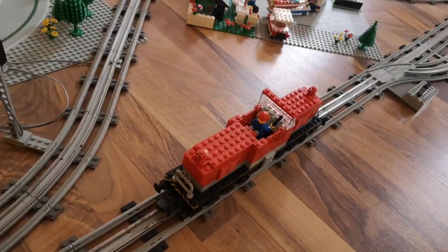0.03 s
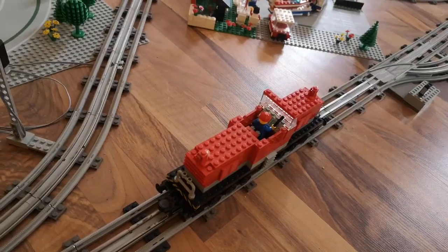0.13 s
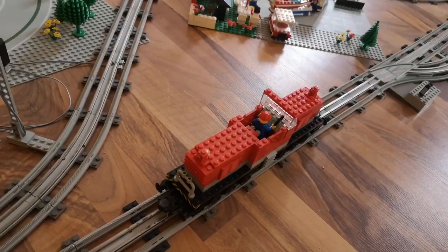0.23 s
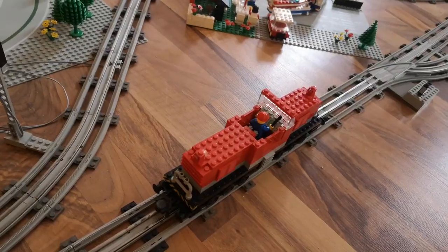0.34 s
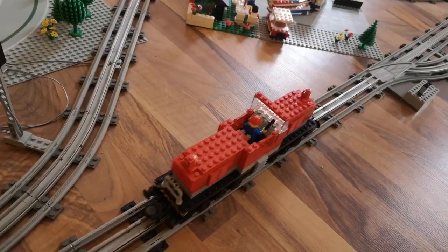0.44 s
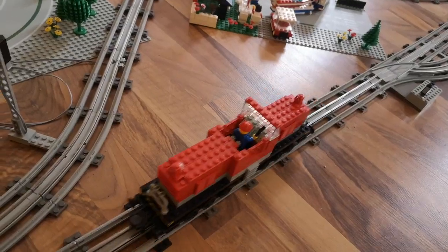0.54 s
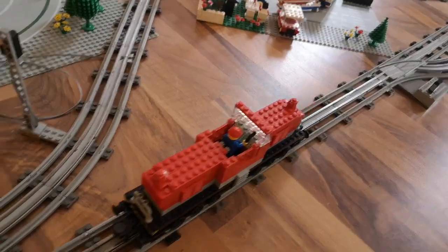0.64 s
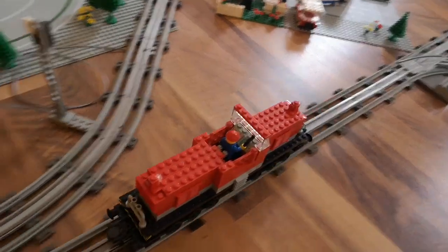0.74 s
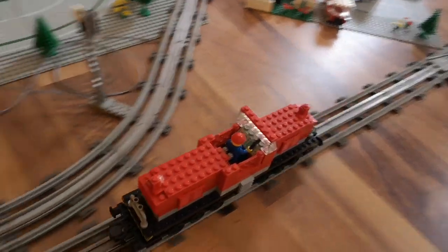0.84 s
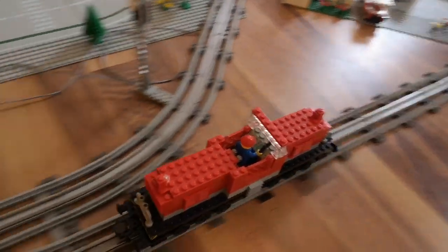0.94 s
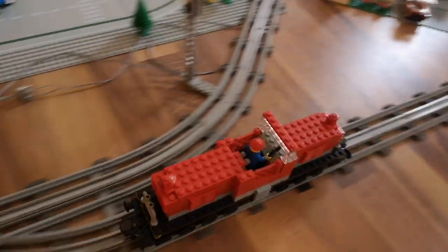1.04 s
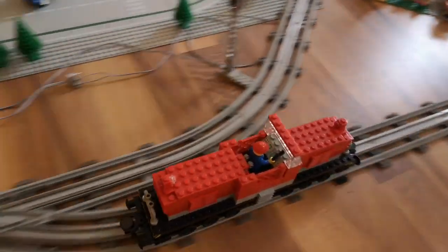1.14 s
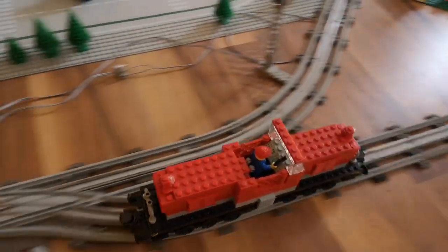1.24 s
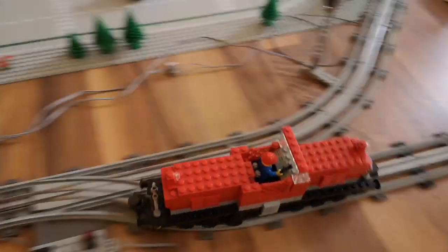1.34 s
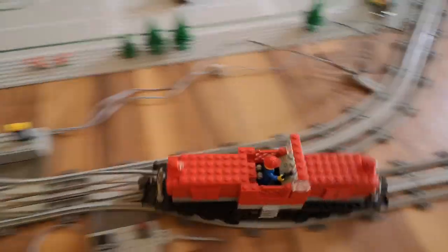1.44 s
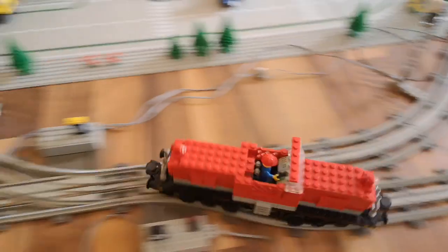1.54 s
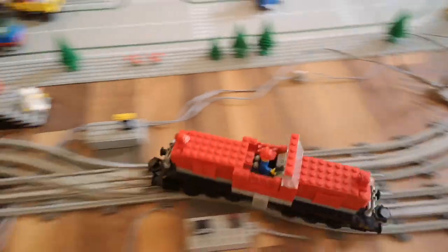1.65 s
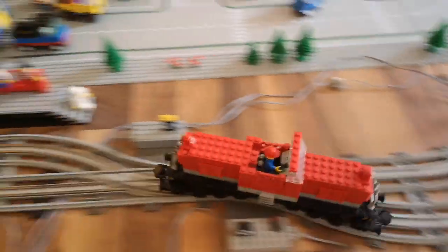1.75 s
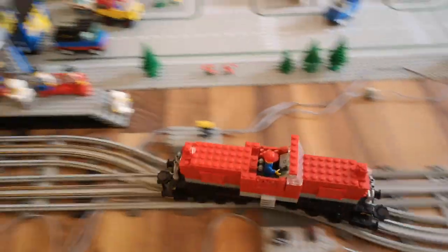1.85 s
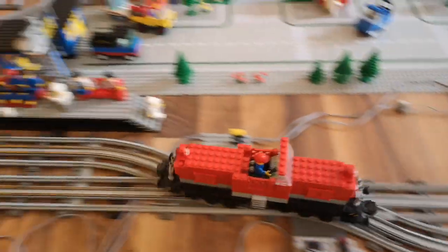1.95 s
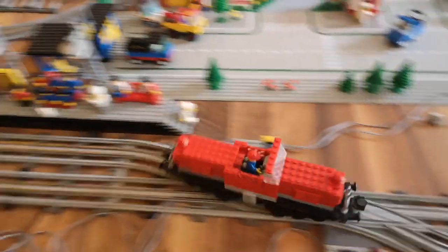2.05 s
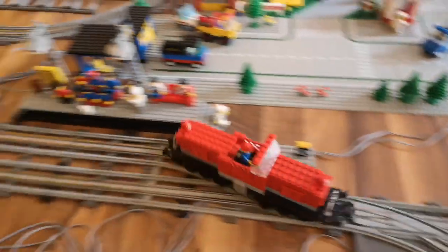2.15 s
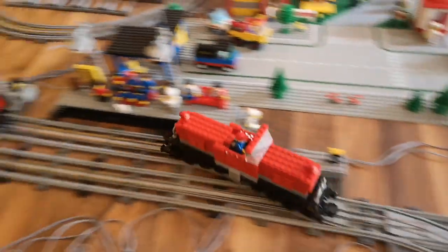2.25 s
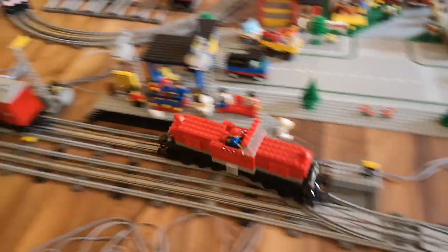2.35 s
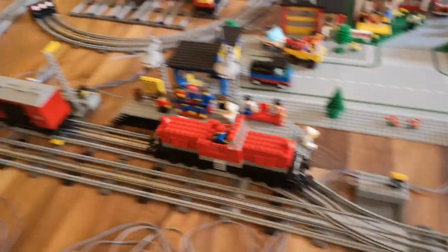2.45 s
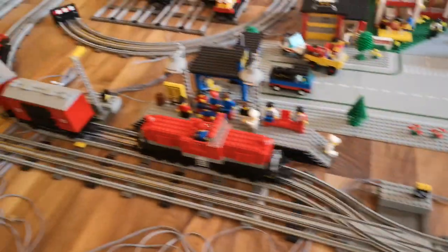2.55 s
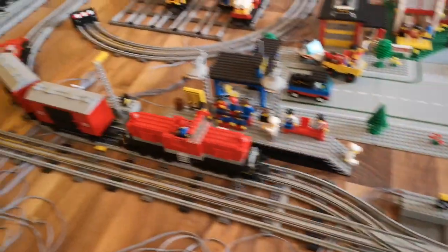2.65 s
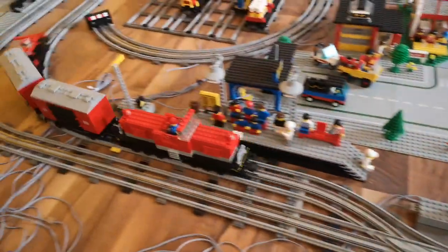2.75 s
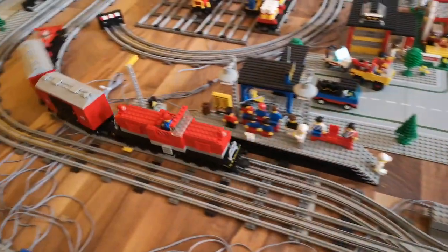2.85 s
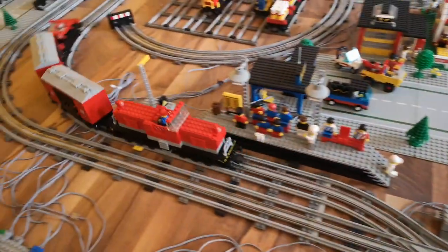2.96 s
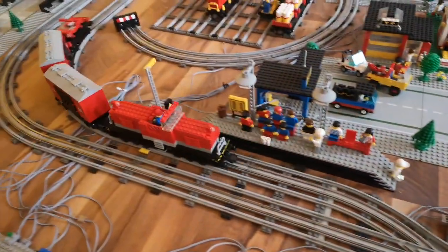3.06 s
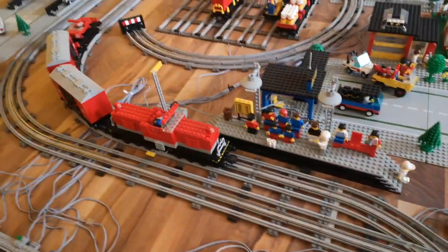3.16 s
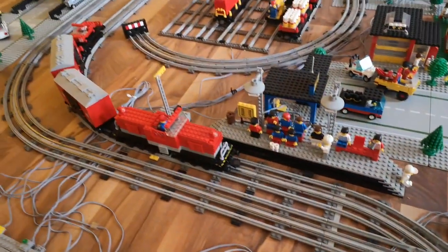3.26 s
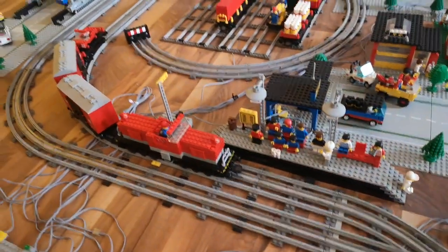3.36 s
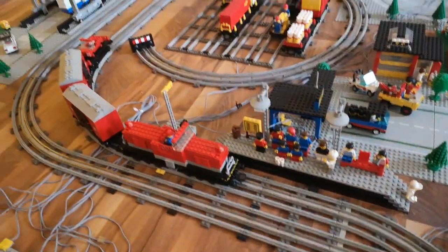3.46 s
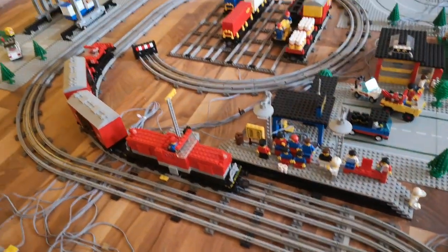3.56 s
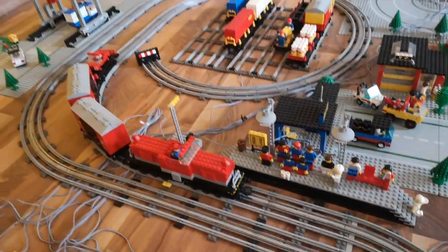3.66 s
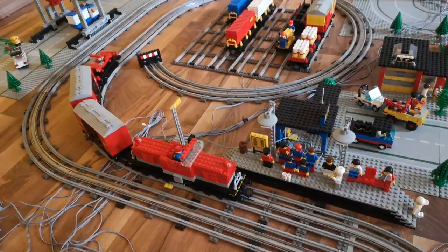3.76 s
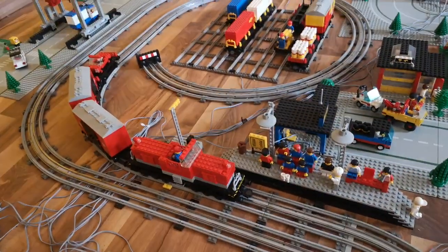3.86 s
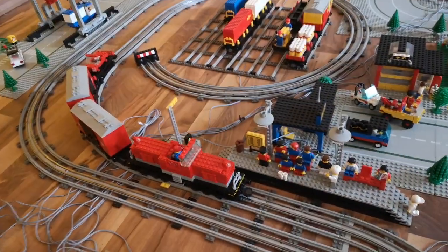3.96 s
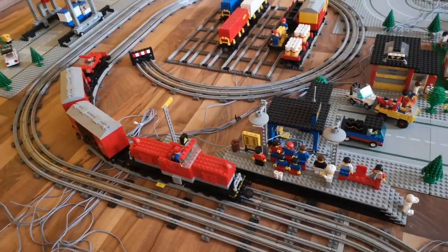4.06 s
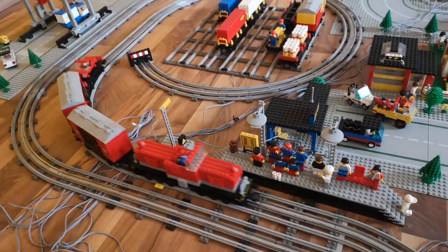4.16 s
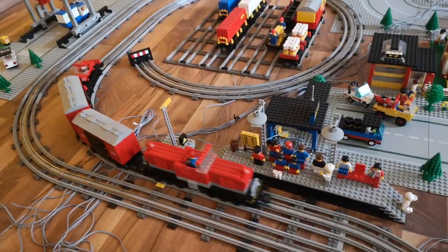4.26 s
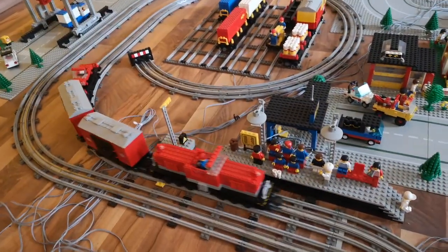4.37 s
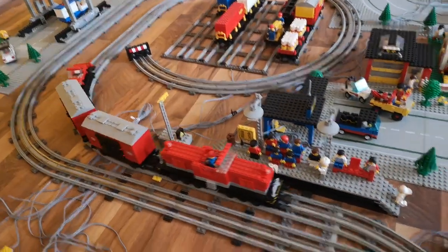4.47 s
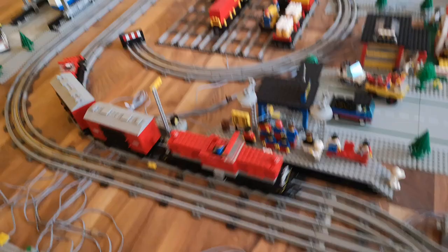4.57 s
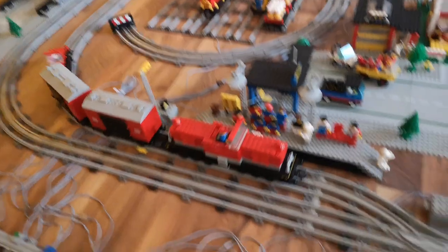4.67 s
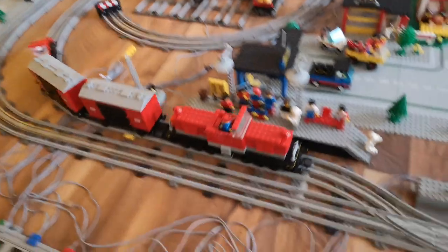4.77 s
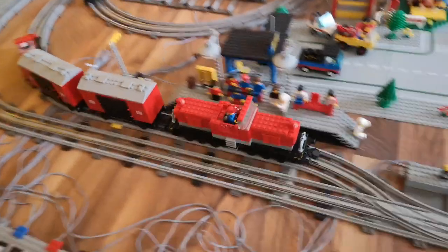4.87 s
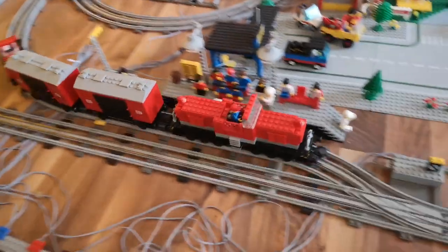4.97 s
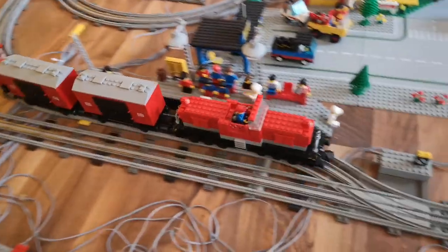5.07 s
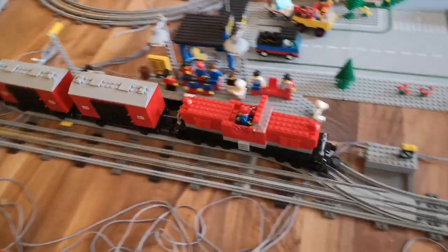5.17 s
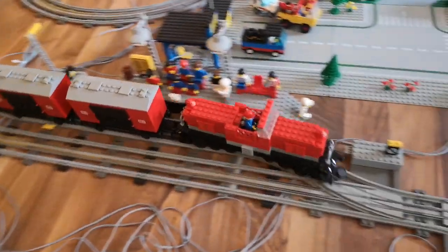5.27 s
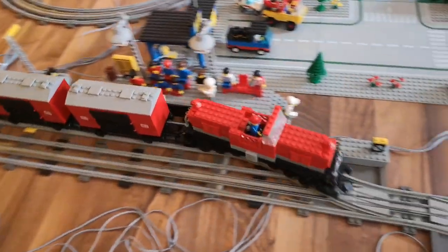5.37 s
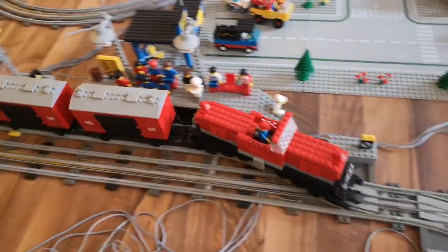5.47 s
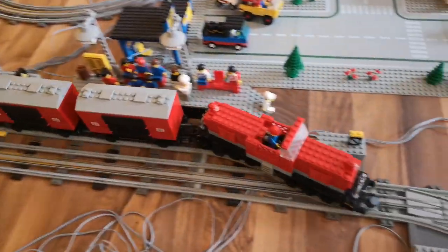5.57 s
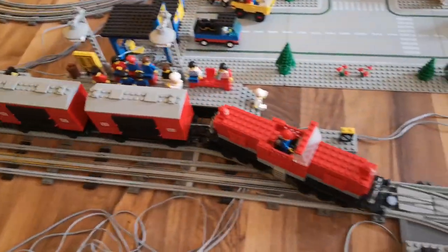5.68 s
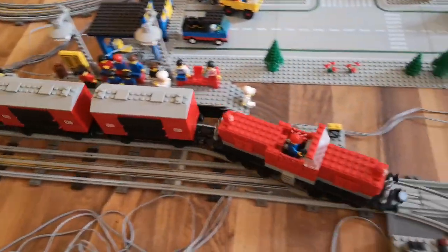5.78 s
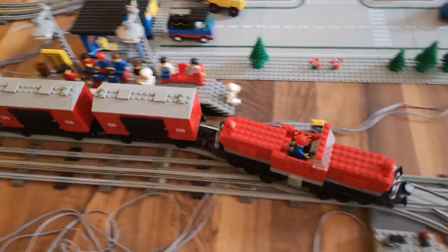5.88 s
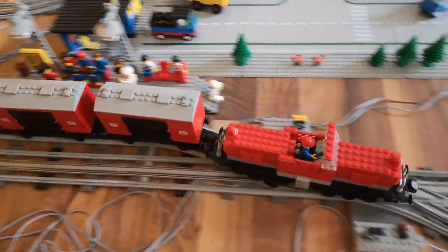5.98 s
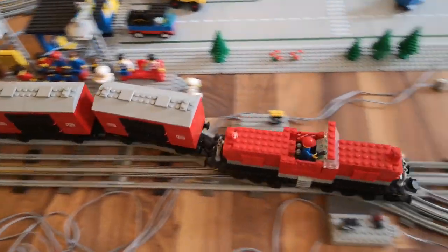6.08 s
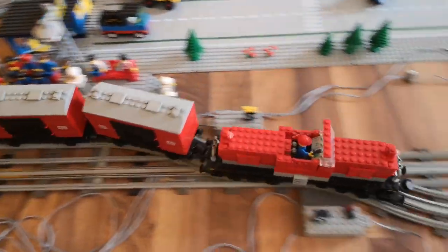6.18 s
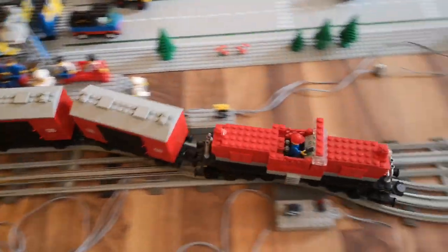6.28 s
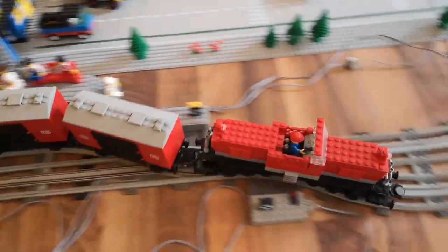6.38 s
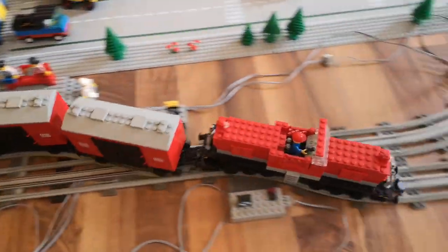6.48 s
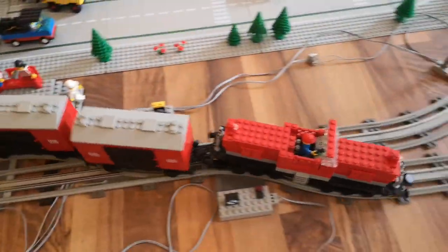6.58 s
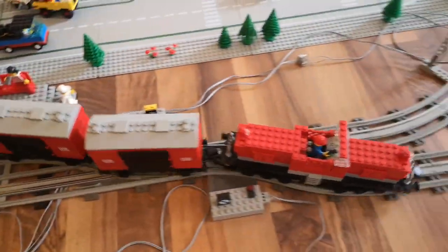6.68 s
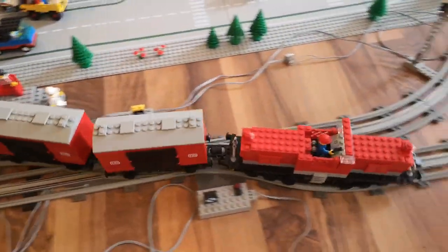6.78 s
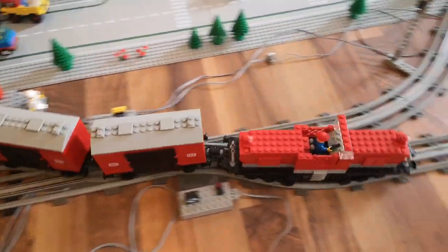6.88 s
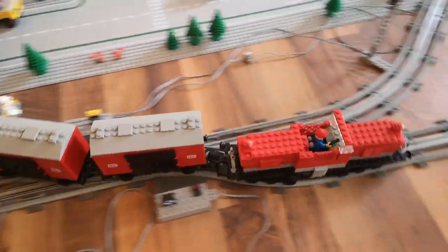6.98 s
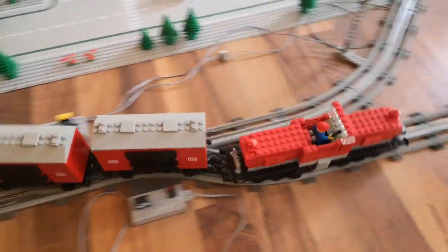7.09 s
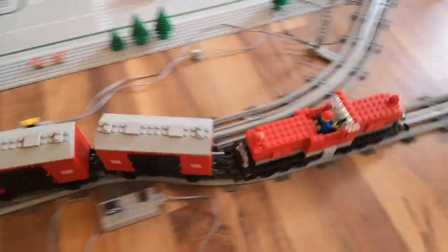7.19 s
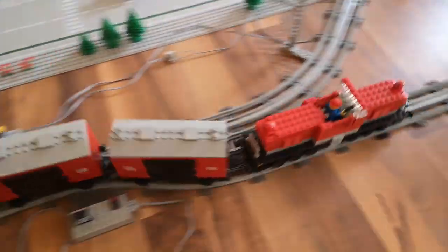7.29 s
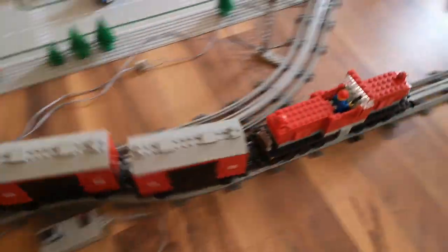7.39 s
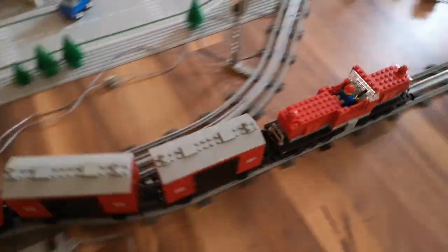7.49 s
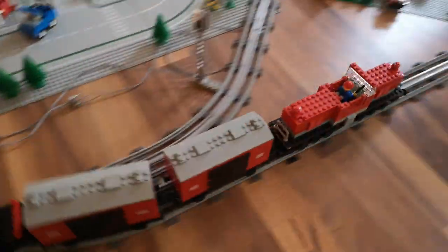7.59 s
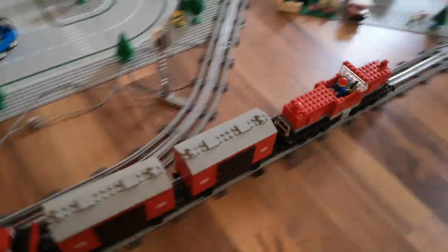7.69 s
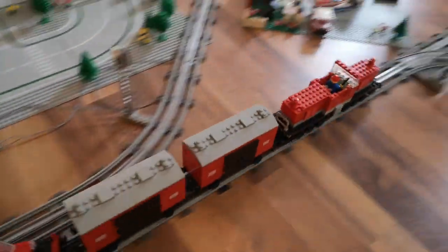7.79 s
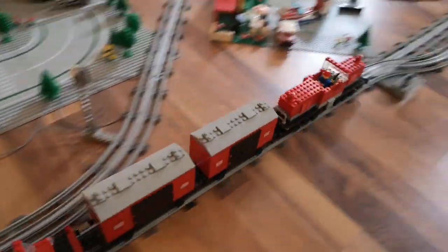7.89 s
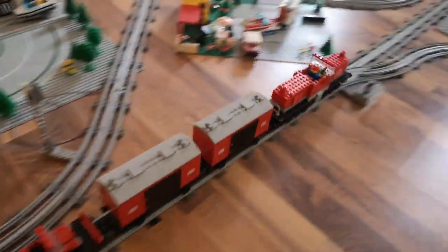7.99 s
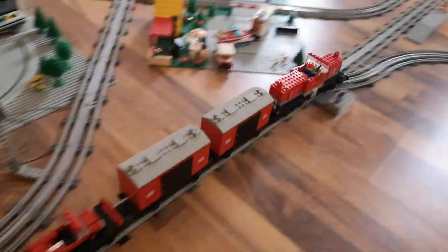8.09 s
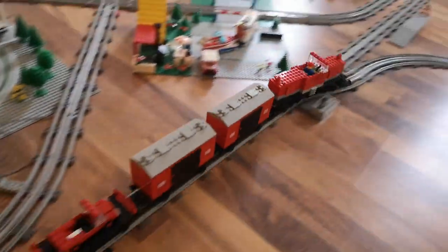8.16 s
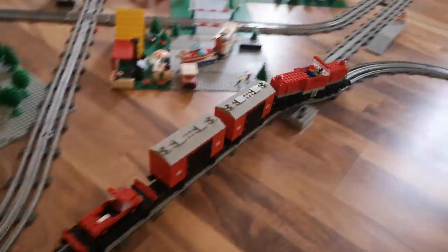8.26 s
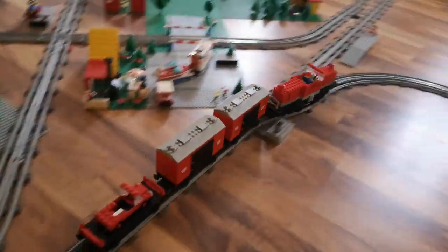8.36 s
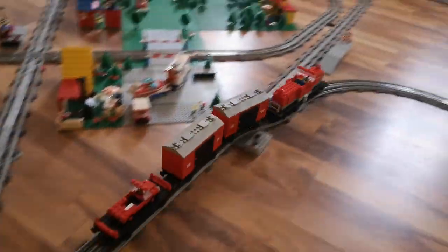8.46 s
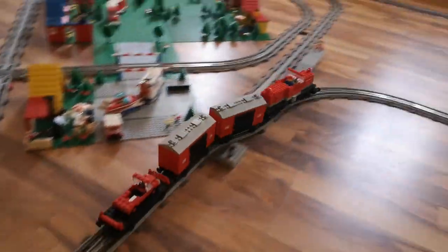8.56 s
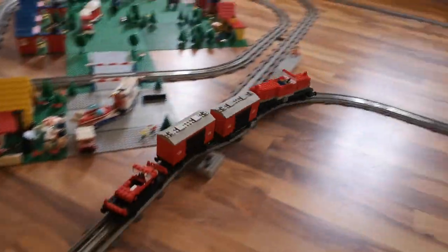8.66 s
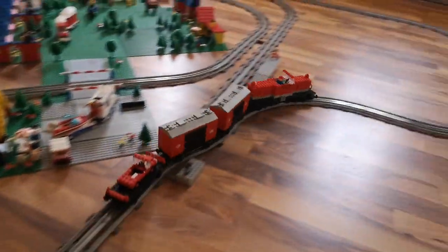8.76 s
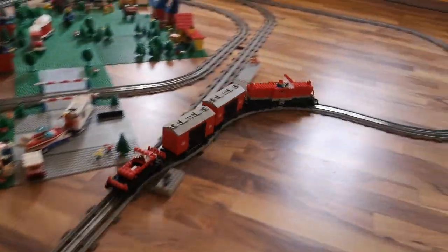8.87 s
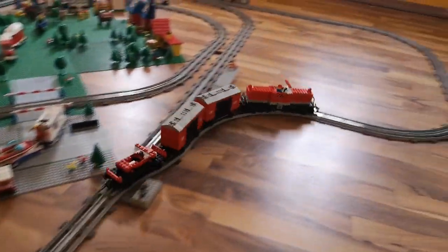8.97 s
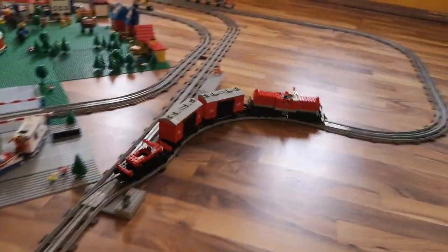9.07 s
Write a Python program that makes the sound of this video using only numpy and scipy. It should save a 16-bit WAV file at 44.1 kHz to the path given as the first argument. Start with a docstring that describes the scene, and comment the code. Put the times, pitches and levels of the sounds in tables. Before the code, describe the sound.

In a quiet room, a small plastic electric train starts with a short squeak and whirs over ribbed rails, drumming on the wooden floor. Clicks and sharp plastic knocks quicken over points until it bumps into wagons with a rattling crunch and stops. After a brief near-silence, tiny squeaks mark a slow departure, and the coupled train grows into louder hiss and clatter. Close stereo microphone, short room tail.

```python
"""A plastic electric toy train runs over a wooden floor, backs into its wagons, stops, and pulls them away.
Wheels hiss on ribbed rails and click over joints; loose bricks rattle, rubbed parts ring and hollow track drums:
all are impact grains, pulses or friction noise shaped by resonances. Plastic knocks are decaying sine partials.
At a crawl the drive squeaks by stick-slip and its motor hums with a blurred pitch.
Floorboards rumble as noise-fed modes; the train has a short room tail over quiet room noise."""
import sys
import numpy as np
from scipy import signal
from scipy.fft import rfft, irfft
from scipy.io import wavfile
from scipy.ndimage import uniform_filter1d

SR = 44100
rng = np.random.default_rng(int(sys.argv[2]) if len(sys.argv) > 2 else 0)


def store_wav(level_fs):
    """Save 16-bit WAV to argv[1]."""
    pcm = np.round(np.clip(np.atleast_2d(level_fs), -1, 1) * 32767)
    wavfile.write(sys.argv[1], SR, pcm.T.astype(np.int16))


N = 402633
TIME = np.arange(N) / SR


def undb(db):
    """Amplitude ratio: 20 dB is a factor of ten in gain."""
    return 10 ** (np.asarray(db) / 20)


def decibels(*gains):
    """Incoherent addition: the powers of unrelated sounds add; the sum is given in dB."""
    return 10 * np.log10(sum(g ** 2 for g in gains) + 1e-12)


def unit(x):
    """Normalization of mean power: scale to rms 1."""
    return x / np.sqrt(np.mean(x ** 2))


def curves(table):
    """Linear interpolation in time of each table column after the first."""
    s, *columns = np.transpose(table)
    return [np.interp(TIME, s, c) for c in columns]


def colour(x, table, size=8192):
    """Minimum-phase filtering: a folded cepstrum gives a causal filter with the (Hz, dB) response."""
    hz, db = np.transpose(table)
    bins = np.maximum(np.arange(size // 2 + 1) * SR / size, 1)
    response_db = np.interp(np.log(bins), np.log(hz), db)
    cepstrum = irfft(np.log(undb(response_db)))
    cepstrum[1:size // 2] *= 2
    cepstrum[size // 2 + 1:] = 0
    impulse = irfft(np.exp(rfft(cepstrum)))
    return signal.fftconvolve(x, impulse[None], axes=1)[:, :N]


def noise(alike):
    """Partial coherence: white noise at two microphones with the given correlation."""
    mid, side = rng.standard_normal((2, N))
    alike = np.clip(alike, -1, 1)
    return (np.sqrt(1 + alike) * mid + np.sqrt(1 - alike) * np.array([side, -side])) / np.sqrt(2)


def fade(energy, t60):
    """Exponential decay: each input of energy falls 60 dB in t60 seconds."""
    return signal.lfilter([1], [1, -np.exp(-2 * np.log(1000) / (t60 * SR))], energy)


def contacts(rate, spread_db, t60):
    """Random impact process: envelope of many small blows of unequal size, rms 1."""
    sizes = undb(spread_db * np.minimum(rng.exponential(size=N), 4))
    blows = (rng.random(N) < rate / SR) * sizes ** 2
    return unit(np.sqrt(fade(blows, t60) + 1e-12))


def walk(rate):
    """Low-frequency fluctuation: random levels held 1 / rate s, smoothed twice, rms 1."""
    k = int(SR / rate)
    steps = np.repeat(rng.standard_normal(4096), k)[:N]
    return unit(uniform_filter1d(uniform_filter1d(steps, k), k))


def burst(s, attack_s, hold_s, t60):
    """Transient envelope: linear attack, hold and exponential decay."""
    age = TIME - s
    return np.clip(age / attack_s, 0, 1) * undb(-60 * np.maximum(age - attack_s - hold_s, 0) / t60)


# spectrum of the still air: pitch_hz [Hz], level_db [dB, relative]
ROOM_TONE = [(20, -0.5), (137, -13.5), (561, -28), (1700, -22), (4050, -35), (13000, -47.5)]


def still_air(level_db=-63):
    """Diffuse background: steady, partly coherent noise with a falling spectrum."""
    return unit(colour(noise(0.63), ROOM_TONE)) * undb(level_db)


# speed backing into the station, then creeping out with the wagons: start_s [s], speed [m/s]
SPEED_IN = [(0.305, 0), (0.325, 0.225), (0.55, 0.26), (0.8, 0.44), (1.4, 0.45), (1.9, 0.35), (2.3, 0.42),
            (2.78, 0.44), (3.1, 0.27), (3.24, 0.28), (3.41, 0)]
SPEED_OUT = [(3.82, 0), (3.85, 0.12), (4.44, 0.135), (4.48, 0.205), (5.6, 0.245), (6.9, 0.215), (7.5, 0.37),
             (8.05, 0.33), (9.13, 0.355)]
FULL_M_S = 0.47


def motion():
    """Kinematics: speed as a share of full speed, and its signed integral, metres towards the station."""
    (back,), (forth,) = curves(SPEED_IN), curves(SPEED_OUT)
    return np.abs(back - forth) / FULL_M_S, np.cumsum(back - forth) / SR


def by_speed(speed, full_db, db_per_decade):
    """Power law of rolling noise: gain grows by a fixed number of dB per tenfold speed."""
    return undb(full_db + db_per_decade * np.log10(speed + 1e-6))


# spectrum of wheels on ribbed rails: pitch_hz [Hz], level_db [dB, relative]
WHEEL = [(250, -14), (420, -3.5), (1600, -0.5), (1950, 6), (2500, -10.5), (3300, -6), (4400, -4), (5500, 4),
         (6400, 0.5), (7400, 0.5), (8300, -6), (9400, -2), (11000, -11), (15000, -25.5)]


def rolling(hiss_db, brighten=0.48):
    """Rolling-contact noise: wheels and gears tick on ribbed rails, brighter the harder they roll."""
    grain = contacts(rate=1400, spread_db=2.0, t60=0.033)
    hiss = unit(colour(grain * noise(0.018), WHEEL))
    dull = signal.sosfilt(signal.butter(1, 9000, fs=SR, output="sos"), hiss)
    treble = (hiss - dull) * undb(brighten * (hiss_db + 50.0))
    return (dull + treble) * undb(hiss_db + 5.0)


# spectrum of the loose bodies: pitch_hz [Hz], level_db [dB, relative]
BODY = [(500, -58.5), (1100, -10.5), (1400, -5.5), (1650, 3.5), (1850, 4.5), (2100, 2.5), (2350, 2),
        (2750, -1), (3300, -4.5), (5000, -10), (9000, -68)]
# limits between the bands in which separate parts ring: pitch_hz [Hz]
PART_EDGES_HZ = [500, 1400, 1750, 2050, 2400, 2900, 9000]


def rattle(rattle_db, clump_db=2.5, shift_db=1.7):
    """Impact-excited resonance: bricks and bogies chatter in clusters, each part in its own shifting band."""
    parts = 0
    for band in zip(PART_EDGES_HZ, PART_EDGES_HZ[1:]):
        taps = undb(clump_db * walk(rate=90) + shift_db * walk(rate=14))
        ring = signal.butter(2, band, "bandpass", fs=SR, output="sos")
        parts = parts + signal.sosfilt(ring, unit(taps) * noise(0))
    grain = contacts(rate=800, spread_db=1.8, t60=.009)
    return unit(colour(grain * parts, BODY)) * undb(rattle_db - 1.0)


# spectrum of the hollow track pieces: pitch_hz [Hz], level_db [dB, relative]
HOLLOW = [(200, -10.5), (320, -2.5), (450, -22), (630, -14.5), (735, 0.5), (860, 0.5), (1250, -3.5),
          (1800, -16.5), (4000, -32.5)]


def track(roll_db):
    """Cavity resonance: the hollow track pieces drum under the wheels."""
    grain = contacts(rate=770, spread_db=1.5, t60=0.016)
    return unit(colour(grain * noise(0.61), HOLLOW)) * undb(roll_db - 8.5)


# resonances of the floorboards: pitch_hz [Hz], width_hz [Hz], level_db [dB, relative]
BOARDS = [(65, 3.9, -3), (95.7, 9.3, -0.5), (122.7, 12.5, 0), (161, 8.4, -1.5), (205.5, 41, -10.5),
          (299, 51, -14)]


def rumble(rumble_db, centre_hz, reach_db=11, broad_db=-11.0):
    """Modal excitation: noise drives the board modes, weaker the farther they lie from centre_hz."""
    broad = [(20, -17), (70, -2.5), (200, -0.5), (420, -17.5), (900, -35.0)]
    boards = undb(broad_db) * unit(colour(noise(1.0), broad))
    for hz, width, db in BOARDS:
        mode = signal.lfilter(*signal.iirpeak(hz, hz / width, fs=SR), noise(1 - (hz / 480) ** 3))
        mode = signal.lfilter(*signal.iirpeak(hz, 1, fs=SR), mode)
        octaves_away = np.abs(np.log2(hz / centre_hz))
        boards = boards + unit(mode) * undb(db - reach_db * octaves_away)
    # the wheels push steadily, so the boards beat without long lulls
    swell = np.sqrt(uniform_filter1d(np.mean(boards ** 2, axis=0), size=5000))
    return boards / swell * undb(rumble_db + 0.28)


# drive sticking and squeaking: start_s [s], length_s [s], pitch_hz [Hz], slip_rate [1/s],
# level_db [dB, before a 2 dB lift and the pan], roughness [ratio]
SQUEAKS = [(0.318, 0.031, 5630, 300, -42.5, 0.3), (0.342, 0.13, 5930, 360, -45.5, 0.66),
           (3.161, 0.058, 4930, 490, -51, 1.2), (3.2, 0.012, 5880, 460, -36, 0.33),
           (3.225, 0.013, 5370, 550, -38.5, .2), (3.832, 0.027, 4900, 200, -46, 1.12),
           (3.853, 0.017, 5030, 330, -36.5, 1.14), (3.871, 0.012, 5370, 350, -33.5, 0.95),
           (3.925, 0.013, 5320, 400, -38.5, 0.7), (3.996, 0.0086, 5380, 380, -44.5, 0.65),
           (4.047, 0.0081, 5460, 490, -46.5, 0.44)]
# direction of the squeaks: start_s [s], left_minus_right_db [dB]
SQUEAK_PAN = [(.4, 6.5), (3.2, -3.5)]


def squeaks(octave_db=-4, scrape_db=-17, chassis_db=-14, chassis_hz=2100, dull_hz=11200):
    """Stick-slip oscillation: each slip starts three close lines with an octave and rings the chassis."""
    scatter, grip, grit, split, neighbour_db = .015, .4, .19, .1, -6
    out = np.zeros((2, N))
    for s, length, hz, rate, db, rough in SQUEAKS:
        t, start = TIME[:int(length * SR)], int(s * SR)
        slip, age = (t * rate).astype(int), t * rate % 1
        # one random draw per slip, held until the next
        detune, size, left, right, below, above = rough * rng.standard_normal((128, 6))[slip].T
        jitter = rough * grit * uniform_filter1d(rng.standard_normal((2, len(t))), size=30)
        # the rougher the slips, the more each starts afresh and the grittier the squeal
        cycles = np.cumsum(hz * (1 + scatter * detune + jitter), axis=1) / SR
        phase = 2 * np.pi * (cycles + np.array([left, right]) / 2)
        pulse = (np.sin(np.pi * age) * np.exp(-age / grip)) ** abs(rough)
        gate = unit(pulse * undb(2 * size) * np.sin(np.pi * t / length) ** 0.11)
        scrape = uniform_filter1d(rng.standard_normal((2, len(t))), size=5)
        neighbours = np.sin(phase * (1 - split) + np.pi * below) + np.sin(phase * (1 + split) + np.pi * above)
        tone = np.sin(phase) + rough * undb(neighbour_db) * neighbours + undb(octave_db) * np.sin(2 * phase)
        chassis = rough * undb(chassis_db) * np.sin(phase * chassis_hz / hz)
        out[:, start:start + len(t)] += undb(db) * gate * (tone + chassis + 2 * undb(scrape_db) * scrape)
    pan_db, = curves(SQUEAK_PAN)
    out = signal.sosfilt(signal.butter(2, dull_hz, fs=SR, output="sos"), out)
    return out * undb(np.array([pan_db, -pan_db]) / 2 + 2.0)


# motor hums: start_s [s], length_s [s], from_hz [Hz], to_hz [Hz], level_db [dB, nominal]
HUMS = [(.325, .16, 310, 400, -63), (4.5, .3, 205, 250, -60), (5.9, .82, 165, 159, -44)]


def motor(blur_hz=60):
    """Random modulation of a gliding tone: the hum swells and fades as the uneven load blurs its pitch."""
    out, blur = 0, (walk(blur_hz) + 1j * walk(blur_hz)) / np.sqrt(2)
    for s, length, from_hz, to_hz, db in HUMS:
        progress = np.clip((TIME - s) / length, 0, 1)
        phase = 2 * np.pi * np.cumsum(from_hz + (to_hz - from_hz) * progress) / SR
        swell = np.sqrt(2 * np.abs(np.sin(np.pi * progress)))
        out = out + undb(db) * swell * (blur * np.exp(1j * phase)).real
    return out


# wheels dropping into gaps at the points: start_s [s], level_db [dB, before decay]
THUMPS = [(0.771, -27), (0.943, -32), (4.714, -39), (6.029, -27.5)]
THUMP_HZ = 110


def thumps(rise_s=0.0074, t60=0.16):
    """Damped oscillation: a floorboard swings for some cycles under each drop."""
    out = 0
    for s, db in THUMPS:
        out = out + undb(db) * burst(s, rise_s, 0, t60) * np.sin(2 * np.pi * THUMP_HZ * (TIME - s))
    return out


# wheels dropping over rail joints: start_s [s], level_db [dB, before the click spectrum and trim]
JOINTS = [(0.795, -28.5), (0.9737, -25), (1.133, -23), (1.2817, -22.5), (1.427, -26), (1.634, -24.5),
          (1.722, -22), (1.867, -28.5), (2.0243, -24.5), (2.153, -25), (2.277, -25.5), (2.4162, -25),
          (2.522, -24.5), (2.6238, -26.5), (2.7236, -24), (2.8229, -16.5), (4.4695, -36.5), (4.7376, -27.5),
          (4.978, -34.5), (5.406, -28.5), (6.543, -32), (6.687, -35.5), (6.76, -29.5), (6.952, -34),
          (7.2634, -24), (7.397, -25), (7.464, -23), (7.506, -23), (7.591, -20), (7.719, -23.5),
          (7.825, -26.5), (7.949, -24.5), (8.088, -26.5)]
# spectrum of a click: pitch_hz [Hz], level_db [dB, relative]
CLICK = [(300, -21), (900, -3), (2000, 10.5), (3300, 0.5), (5500, 11), (7500, 4), (9500, 2), (12000, -7.5),
         (15000, -15.5)]


def joints(bounce_s=0.0049, bounce_db=-2, tail_db=-18, tail_t60=0.37):
    """Paired impact: two wheels hit a joint in quick succession and the chassis shivers on."""
    s, db = np.transpose(JOINTS)
    energy = np.zeros(N)
    energy[(s * SR).astype(int)] = undb(db) ** 2
    second = s + bounce_s * rng.uniform(1.0, 1.8, len(s))
    energy[(second * SR).astype(int)] += undb(db + bounce_db) ** 2
    strike = fade(energy, t60=.021)
    envelope = np.sqrt(strike + undb(tail_db) ** 2 * fade(energy, tail_t60))
    return colour(uniform_filter1d(envelope, size=24) * noise(.1), CLICK) * undb(-2.8)


# rattle after each blow, relative to the blow [dB]
JOINT_SHAKE_DB, KNOCK_SHAKE_DB, SHAKE_T60_S = -17, -19, .1


def shaking():
    """Energy transfer: each joint and knock leaves a brief decaying rattle, here its envelope."""
    kicks = np.zeros(N)
    for table, shake_db in ((JOINTS, JOINT_SHAKE_DB), (KNOCKS, KNOCK_SHAKE_DB)):
        for s, db, *_ in table:
            kicks[int(s * SR)] += undb(db + shake_db) ** 2
    return np.sqrt(fade(kicks, SHAKE_T60_S))


# bogies crossing points and uneven track: start_s [s], length_s [s], rattle_db [dB], rumble_db [dB]
CROSSINGS = [(0.904, 0.29, -48, -38), (1.324, 0.4, -38.5, -42.5), (1.634, 0.43, -32, -44.5),
             (2.074, 0.26, -33, -40), (2.616, 0.19, -38, -65), (5.517, 0.055, -45.5, -51),
             (5.771, 0.076, -38.5, -47), (5.933, 0.26, -36, -44), (6.398, 0.58, -40, -46.5),
             (7.033, 0.6, -39.5, -39.5), (7.526, 0.22, -30, -38), (8.143, 0.13, -33.5, -54),
             (8.356, 0.15, -32, -58.5), (8.537, 0.11, -35.5, -35.5), (8.692, 0.34, -36.5, -43)]
CROSSING_ATTACK_S, CROSSING_T60_S = 0.031, 1


def crossing():
    """Incoherent excitation: envelopes of clatter in the bodies and pounding on the floor over rough track."""
    clatter, pounding = np.zeros((2, N))
    for s, length, rattle_db, rumble_db in CROSSINGS:
        shape = burst(s, CROSSING_ATTACK_S, length, CROSSING_T60_S)
        clatter = np.hypot(clatter, undb(rattle_db) * shape)
        pounding = np.hypot(pounding, undb(rumble_db) * shape)
    return clatter, pounding


# bogies and couplings knocking: start_s [s], level_db [dB, main partial before decay], pitch_hz [Hz]
KNOCKS = [(1.6333, -19, 2010), (1.7254, -19, 1790), (1.8653, -18, 2050), (2.0222, -17.5, 1790),
          (2.132, -18, 1600), (2.1347, -14.5, 1740), (2.1525, -22, 1750), (2.2077, -8, 1610),
          (2.3405, -21, 2440), (5.7096, -18.5, 1970), (5.7341, -23, 2630), (5.951, -23, 1740),
          (6.163, -24.5, 1800), (6.1892, -23, 1850), (6.328, -26.5, 2500), (6.5408, -22, 1770),
          (6.6869, -24, 1750), (6.7583, -22, 1970), (7.2892, -21, 1740), (7.4623, -18.5, 1890),
          (7.5895, -17, 2130), (7.608, -19, 1900), (7.7223, -17.5, 2300), (7.825, -21.5, 2070),
          (7.948, -21, 2440), (8.4375, -15.5, 2050)]
# partials of a knock: ratio [times its pitch], level_db [dB, relative], t60_s [s]
KNOCK_MODES = [(1, 0, .012), (.64, -13, .007), (1.25, -11, .009)]


def knocks(crack_db=-9, crack_t60=0.0056, bounce_db=-9):
    """Modal impact: plastic parts give a crack and damped partials, then bounce once."""
    contact_s, bounce_s = .0009, (.002, .004)
    out, t, energy = np.zeros((2, N)), TIME[:SR // 10], np.zeros(N)
    swell = np.sin(np.pi / 2 * np.minimum(t / contact_s, 1))
    for s, db, hz in KNOCKS:
        for when, hit_db in ((s, db), (s + rng.uniform(*bounce_s), db + bounce_db)):
            start = int(when * SR)
            energy[start] += undb(hit_db + crack_db) ** 2
            for ratio, mode_db, t60 in KNOCK_MODES:
                # opposite random phase shifts at the two microphones
                phase = 2 * np.pi * hz * ratio * t + rng.standard_normal() * np.array([[1], [-1]]) / 2
                shape = swell * undb(-60 * np.maximum(t - contact_s, 0) / t60)
                out[:, start:start + len(t)] += undb(hit_db + mode_db) * shape * np.sin(phase)
    crack = colour(np.sqrt(fade(energy, crack_t60)) * noise(.1), CLICK)
    return out + crack


# flanges rubbing a wagon or rail part: start_s [s], length_s [s], pitch_hz [Hz], width_hz [Hz], level_db [dB]
RUBS = [(1.968, .079, 2420, 450, -35), (4.726, .049, 1080, 160, -48), (4.965, .175, 1830, 340, -45.5),
        (5.598, .032, 5500, 700, -48), (5.905, .045, 4900, 900, -44), (8.115, .81, 787, 71, -47.5),
        (8.12, .42, 2880, 500, -40.5), (8.475, .62, 2024, 220, -41)]


def rubs(catch_db=2.0, edge_s=.008):
    """Friction-driven resonance: a flange catches and lets go unevenly, feeding one broad band."""
    out, friction = 0, undb(catch_db * walk(rate=120)) * noise(0)
    for s, length, hz, width, db in RUBS:
        ring = signal.butter(2, [hz - width / 2, hz + width / 2], "bandpass", fs=SR, output="sos")
        touch = np.clip(np.minimum(TIME - s, s + length - TIME) / edge_s + .5, 0, 1)
        out = out + undb(db) * touch * unit(signal.sosfilt(ring, friction))
    return out


# engine and wagons jolting together: start_s [s], rattle_db [dB], thump_db [dB], t60_s [s]
SHUNTS = [(2.812, -25, -36, 0.74), (3.849, -47.5, -61, 0.16), (4.724, -44.5, -56, 0.33)]
SHUNT_ATTACK_S, SHUNT_HOLD_S = 0.0063, 0.052
THUMP_ATTACK_S, THUMP_HOLD_S = 0.072, 0.15  # the floor answers more slowly than the bodies


def shunting():
    """Collision response: envelopes of the shudder in the bodies and the slower thump in the floor."""
    shudder = sum(undb(db) * burst(s, SHUNT_ATTACK_S, SHUNT_HOLD_S, t60) for s, db, _, t60 in SHUNTS)
    thump = sum(undb(db) * burst(s, THUMP_ATTACK_S, THUMP_HOLD_S, t60) for s, _, db, t60 in SHUNTS)
    return shudder, thump


def room(x, t60=0.43, treble_t60=0.055, wet_db=-9):
    """Reverberation: floor, furniture and walls return a short diffuse tail that dulls as it fades."""
    t = TIME[:SR // 2]
    echoes = rng.standard_normal((2, len(t))) * (t > .004)
    low = signal.lfilter(*signal.butter(1, 6000, fs=SR), echoes)
    tail = low * undb(-60 * t / t60) + (echoes - low) * undb(-60 * t / treble_t60)
    tail /= np.sqrt(np.sum(tail ** 2, axis=1, keepdims=True))
    return x + undb(wet_db) * signal.fftconvolve(x, tail, axes=1)[:, :N]


# drive levels of the lone engine at full speed [dB, before each layer's own trim], growth [dB per tenfold speed]
HISS_DB, HISS_DB_PER_DECADE = -43.5, 44
RATTLE_DB, RATTLE_DB_PER_DECADE = -48.5, 59
RUMBLE_DB, RUMBLE_DB_PER_DECADE = -37, 22.5
FLOOR_BUILD_S = 0.1
# once coupled, the wagons add to each sound [dB]
COUPLED_S = 3.1
WAGON_HISS_DB, WAGON_RATTLE_DB, WAGON_RUMBLE_DB, WAGON_HOLLOW_DB = 4, 17, 3.5, 2
# relative to the rattle [dB]: flanges rub at crossings; in shunts wheels skid and the track drums
CROSSING_HISS_DB, SHUNT_HISS_DB, SHUNT_HOLLOW_DB = -22, -12.5, -3.5
# floor along the line, open track, points, station: distance_m [m from the start], rumble_db [dB],
# pitch_hz [Hz, to which it answers most], hollowness_db [dB]
ROUTE = [(-0.15, -7, 107, 3.5), (0.05, 0, 97, 3.5), (0.3, -1, 99, 2.5), (0.44, -5, 110, 1.5),
         (0.53, -8, 162, 0), (0.71, -4, 162, 1), (0.8, -2, 124, -1.5), (0.84, -16, 280, -2.5),
         (1.08, -14, 280, 0)]
# direction of the rattling bodies: start_s [s], left_minus_right_db [dB]
BODY_PAN = [(.5, 7), (1.2, 1.5), (2.3, -1), (2.9, 1), (5.2, 2.5), (6.15, -2.5), (6.6, 2.5), (7.2, 0)]


def scene(floor_jolt_db=2.0, hiss_share=0.59):
    """Superposition: speed, load and place set the rolling layers, to which the separate events add."""
    speed, metres = motion()
    marks, *columns = np.transpose(ROUTE)
    floor_db, centre_hz, hollow_db = (np.interp(metres, marks, c) for c in columns)
    wagons = TIME > COUPLED_S
    shudder, thump = shunting()
    clatter, pounding = crossing()

    skid = np.hypot(shudder * undb(SHUNT_HISS_DB), clatter * undb(CROSSING_HISS_DB))
    rolling_hiss = by_speed(speed, HISS_DB + wagons * WAGON_HISS_DB, HISS_DB_PER_DECADE)
    hiss_db = decibels(rolling_hiss, skid)
    rolling_rattle = by_speed(speed, RATTLE_DB + wagons * WAGON_RATTLE_DB, RATTLE_DB_PER_DECADE)
    rattle_db = decibels(rolling_rattle, clatter, shudder, shaking())
    roll_db = hiss_share * hiss_db + (1 - hiss_share) * rattle_db + hollow_db + wagons * WAGON_HOLLOW_DB

    # the floor builds up slowly but falls at once with the speed
    step = 1 / (FLOOR_BUILD_S * SR)
    push = np.minimum(speed, signal.lfilter([step], [1, step - 1], speed))
    full_rumble_db = RUMBLE_DB + floor_db + wagons * WAGON_RUMBLE_DB
    rumble_db = decibels(by_speed(push, full_rumble_db, RUMBLE_DB_PER_DECADE), pounding)

    # uneven track jolts the bodies, the track and the floor together
    jolt, jolt_db = walk(rate=30), .7
    pan_db, = curves(BODY_PAN)
    drum = track(decibels(undb(roll_db), shudder * undb(SHUNT_HOLLOW_DB)) + jolt_db * jolt)
    bodies = rattle(rattle_db + jolt_db * jolt + np.array([pan_db, -pan_db]) / 2)
    train = rolling(hiss_db) + bodies + drum + joints() + knocks() + squeaks() + rubs() + motor()
    floor = rumble(rumble_db + floor_jolt_db * jolt, centre_hz) + rumble(decibels(thump), THUMP_HZ) + thumps()
    return room(train) + floor + still_air()


# difference between the microphone ports: pitch_hz [Hz], left_minus_right_db [dB]
MIC = [(200, -0.5), (900, -1), (2000, -7.5), (2900, 2), (5400, -2), (8100, 4), (10300, -3), (15000, -9)]
TOP_HZ = 15000


def record(dry):
    """Transducer response: two ports colour the sound in opposite senses; a low-pass cuts the top."""
    hz, db = np.transpose(MIC)
    ports = []
    for k, sign in enumerate((1, -1)):
        response = np.column_stack([hz, sign * db / 2])
        ports.append(colour(dry[[k]], response)[0])
    return signal.sosfilt(signal.ellip(8, .2, 70, TOP_HZ, fs=SR, output="sos"), np.array(ports))


dry = scene()
out = record(dry)
store_wav(out)
```